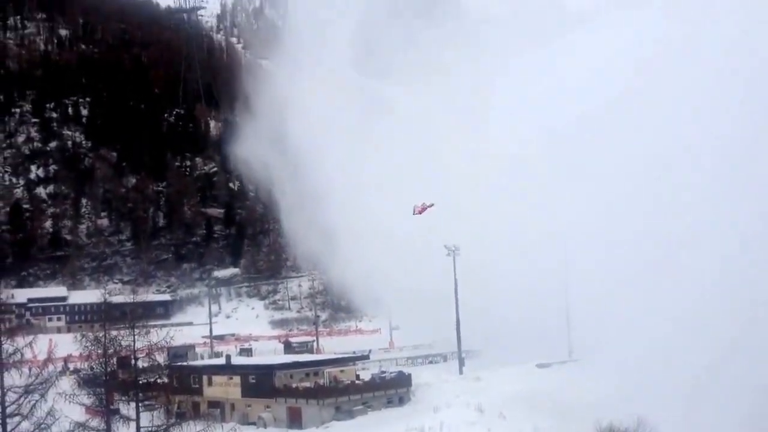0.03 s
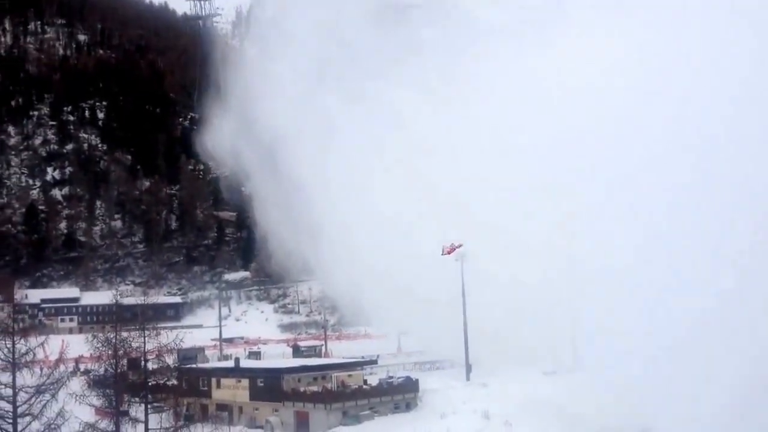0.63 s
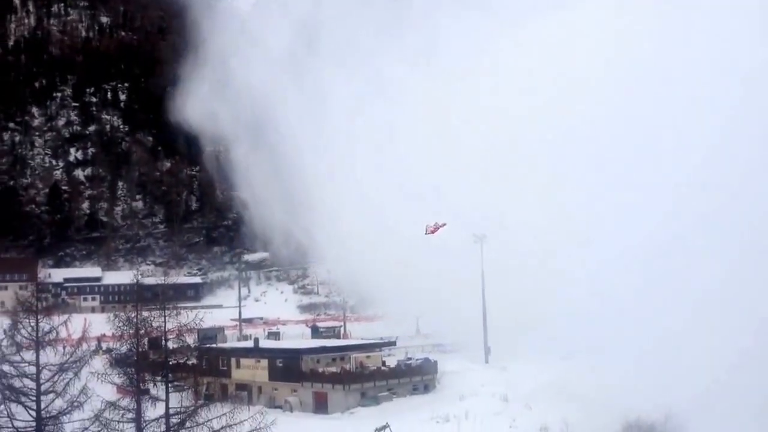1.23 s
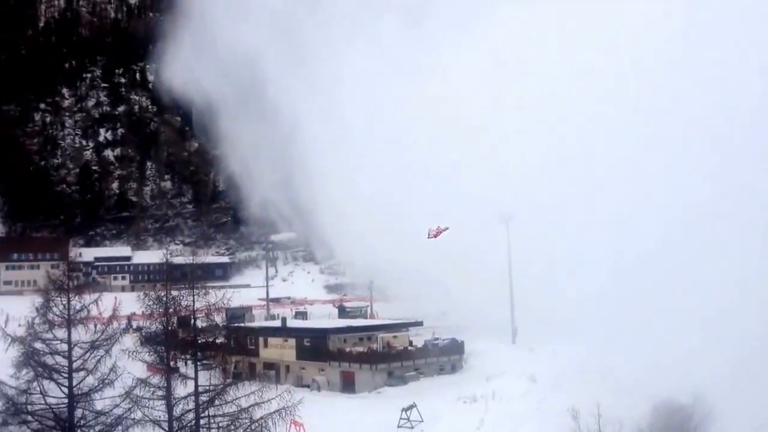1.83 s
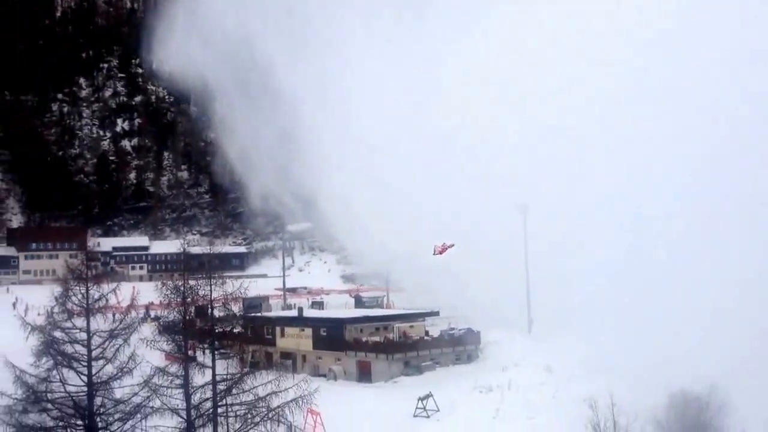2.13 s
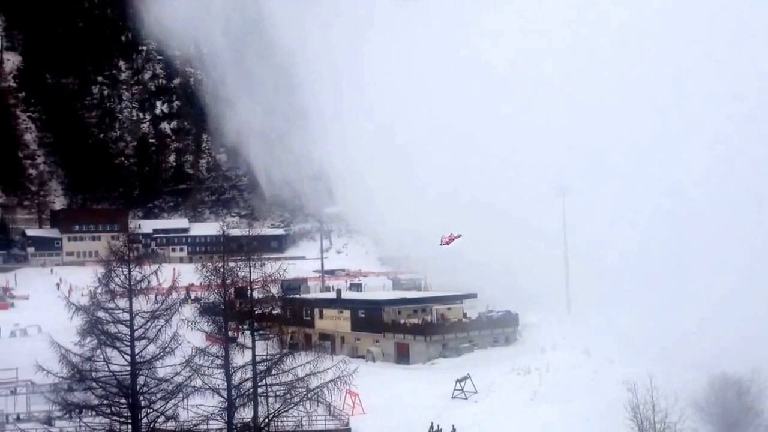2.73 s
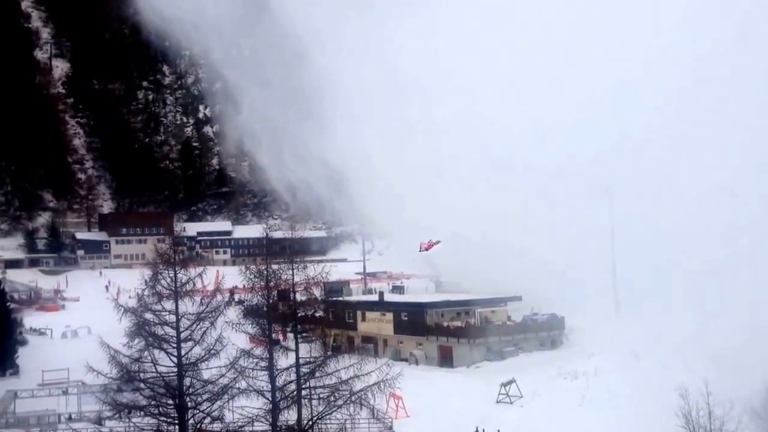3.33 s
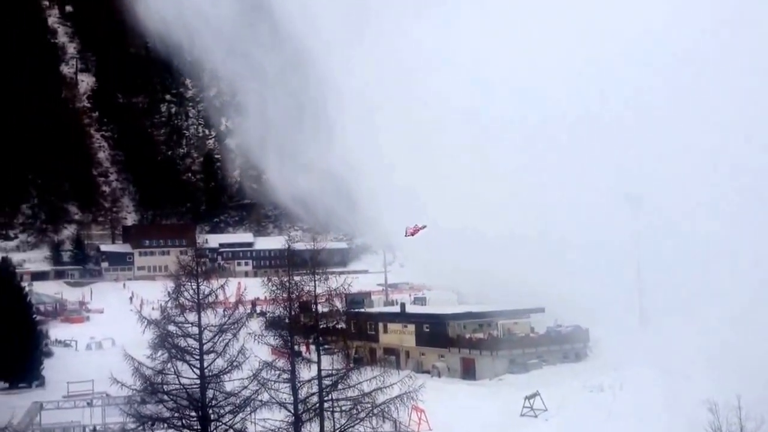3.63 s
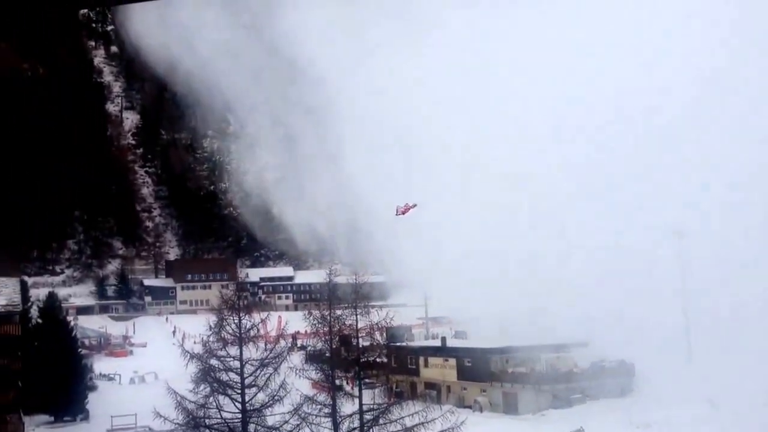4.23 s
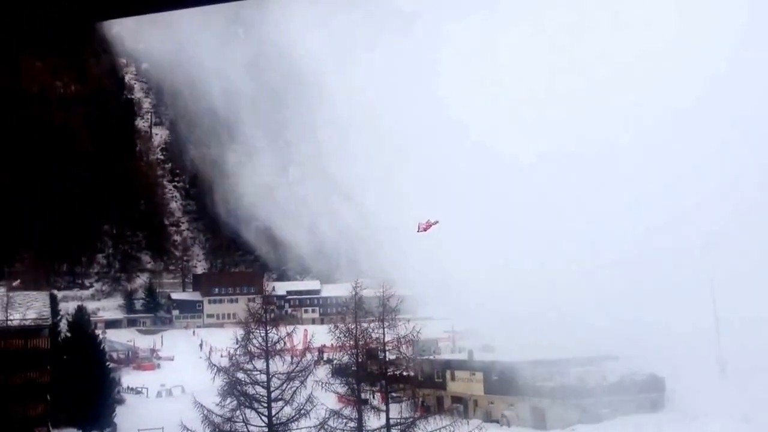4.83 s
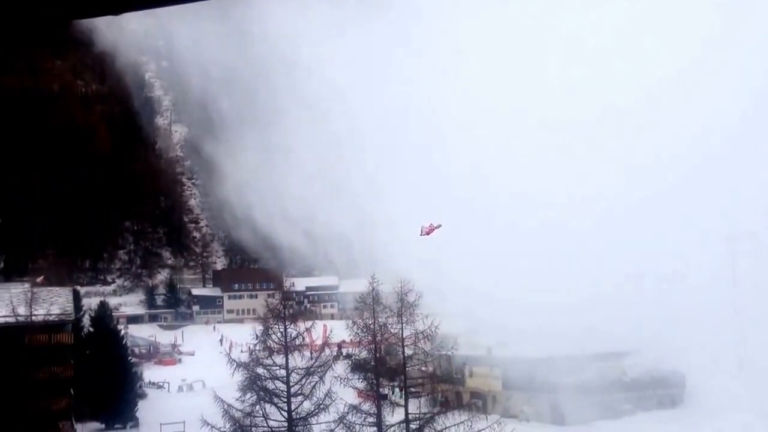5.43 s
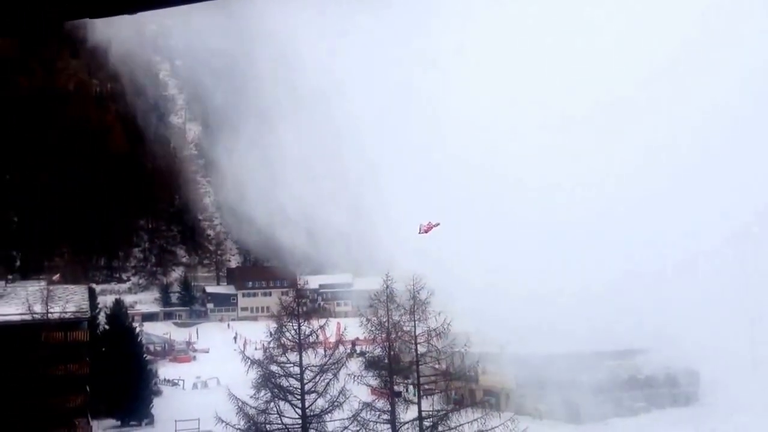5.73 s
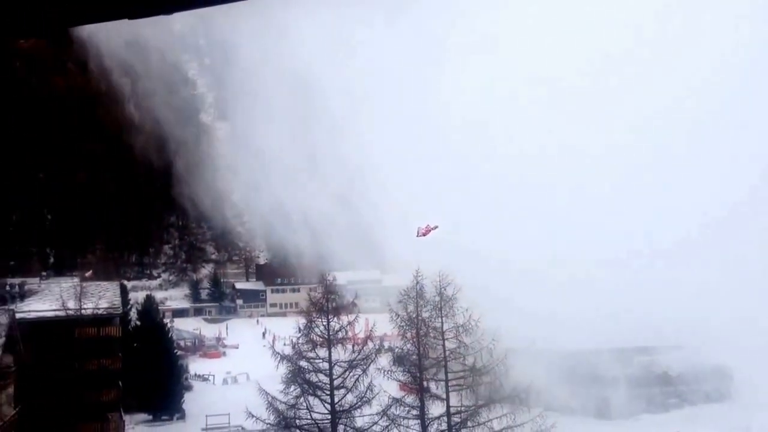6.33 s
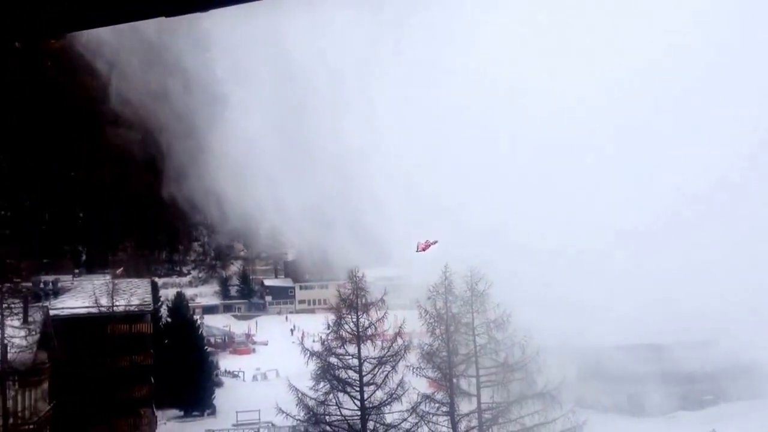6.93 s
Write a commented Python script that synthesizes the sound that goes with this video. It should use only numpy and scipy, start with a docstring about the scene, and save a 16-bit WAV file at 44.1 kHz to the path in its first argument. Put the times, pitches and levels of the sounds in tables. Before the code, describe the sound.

A far-off avalanche roars and hisses steadily while gusts thump and flutter on the microphone, easing briefly, then returning harder.

```python
"""A powder avalanche rolls down a mountainside and over a ski area, a steady rush far from the microphone.
At first gusts hit the microphone: each eddy is a short, dull thud over a low flutter; the fastest snap.
As the wind drops, three faint, thin whistles sound in the distance, between about 1.8 and 3.3 s.
From 3.5 s the gusts return. Past 5 s they are at their hardest and make the gain control duck the rush."""
import sys
import numpy as np
from scipy import signal
from scipy.fft import rfft, irfft
from scipy.io import wavfile
from scipy.ndimage import uniform_filter1d, minimum_filter1d

SR = 44100
rng = np.random.default_rng(int(sys.argv[2]) if len(sys.argv) > 2 else 0)


def to_wav(sig):
    """Store sig (one row per channel, or 1-D mono) as 16-bit WAV at the path in sys.argv[1].

    Samples outside -1..1 are clipped; the rate is SR.
    """
    pcm = np.clip(np.atleast_2d(sig), -1, 1) * 32767
    pcm = np.round(pcm).astype(np.int16)
    wavfile.write(sys.argv[1], SR, pcm.T)  # frames by channels


N = 308700
TIME = np.arange(N) / SR


# Hard eddies, right on the microphone. Each row: middle in seconds, level in dB, length in seconds,
# corner in Hz above which the turbulence dies (thuds and snaps each scale it).
HARD_EDDIES = [(.008, -9, .013, 468), (0.036, -18, .014, 420), (0.077, -17, .016, 254),
               (.112, -5.5, .005, 400), (.134, -11, 0.021, 379), (0.235, -16, .022, 345),
               (.263, -10, .02, 295), (.385, -15.5, .013, 256), (.548, -16.5, .005, 225),
               (0.639, -18.5, .005, 256), (0.709, -22, .022, 193), (0.813, -21, .014, 230),
               (0.931, -28, .02, 233), (1.222, -16.5, .02, 217), (1.241, -20.5, .016, 283),
               (1.329, -32, 0.012, 220), (1.596, -16, .005, 185), (1.62, -21, .018, 198),
               (1.73, -19.5, .008, 137), (1.811, -22, .0085, 242), (2.028, -21.5, .006, 162),
               (2.13, -20.5, 0.025, 195), (2.169, -23, 0.01, 222), (2.405, -22, .018, 114),
               (2.455, -24, 0.032, 187), (2.555, -26.5, .018, 121), (3.546, -28.5, .01, 140),
               (3.598, -30.5, .024, 110), (3.853, -20, 0.027, 278), (3.952, -14, 0.0086, 363),
               (3.975, -17, 0.02, 314), (4.054, -18.5, .013, 256), (4.088, -15.5, .007, 230),
               (4.175, -30.5, 0.033, 204), (4.368, -30, .037, 184), (4.602, -23.5, .015, 233),
               (4.64, -22.5, .016, 303), (4.714, -16, 0.0097, 430), (4.735, -17, .006, 246),
               (4.758, -17.5, .018, 329.4), (4.877, -17.5, .013, 410), (4.953, -20.5, .021, 343),
               (5.063, -12, 0.013, 344), (5.09, -16.5, 0.022, 293), (5.11, -5, .006, 513),
               (5.125, -5.5, .009, 328.5), (5.172, -7.5, .006, 500), (5.191, -17.5, 0.015, 470),
               (5.209, -9, .006, 563), (5.249, -12, .012, 745), (5.275, -13.5, .016, 590),
               (5.296, -4.5, .009, 400), (5.418, -17.5, .015, 454), (5.448, -16.5, .014, 466),
               (5.467, -10.5, 0.0026, 600), (5.489, -6.5, .016, 545), (5.563, -6, .016, 440),
               (5.603, -14.5, 0.0027, 690), (5.614, -9, 0.0097, 327), (5.639, -12, 0.011, 420),
               (5.708, -3.5, .0064, 523), (5.727, -10, .011, 593), (5.937, -10, .0046, 328.5),
               (5.999, -14, .012, 309), (6.363, -12.5, .015, 432), (6.482, -21, 0.0064, 400),
               (6.531, -15, .009, 302), (6.569, -15, .005, 391), (6.622, -5.5, .008, 503),
               (6.653, -15.5, 0.019, 275), (6.674, -12, .006, 326.3), (6.747, -8.5, .015, 324),
               (6.784, -20.5, 0.024, 210), (6.876, -17.5, .01, 168)]
def buffets(eddies, rise=0.62, fall=0.724, wake=0.045, corner_scale=0.97, size=8192, count=400):
    """Each eddy thuds on the microphone: a brief swell of random pressure with a weaker wake around it."""
    out = np.zeros(N + 2 * size)
    t = (np.arange(size) - size // 2) / SR
    for (s, db, length, corner_hz), churn in zip(eddies, rng.standard_normal((count, size))):
        width = length * np.where(t < 0, rise, fall)
        swell = np.exp(-(t / width) ** 2) + wake * np.exp(-abs(t) / length)
        thud = port(churn * swell, corner_hz * corner_scale, damping=1.427) * np.hanning(size)
        thud *= np.sqrt(length * SR / np.sum(thud ** 2))  # the level holds over the eddy's length
        centre = np.sum(np.arange(size) * thud ** 2) / np.sum(thud ** 2)
        start = int(s * SR - centre) + size
        out[start:start + size] += undb(db) * thud
    return out[size:size + N]


def snaps(gain_db=-2, above_hz=328, corner_scale=1.574, lead=0.2013, rebound_s=0.0005, size=2048):
    """A fast eddy tears off the microphone port: a pressure jump of either sign, then instant suction."""
    out = np.zeros(N + size)
    t = np.arange(size) / SR
    suction = np.exp(-t / rebound_s)
    jump = (t == 0) - suction / suction.sum()
    signs = rng.choice([-1, 1], len(HARD_EDDIES))
    for (s, db, length, corner_hz), sign in zip(HARD_EDDIES, signs):
        if corner_hz > above_hz:
            snap = port(jump, corner_scale * corner_hz, damping=0.99)
            start = max(int((s - lead * length) * SR), 0)  # just ahead of the thud's middle
            out[start:start + size] += sign * undb(db + gain_db) * snap / abs(snap).max()
    return out[:N]


# Wind where the microphone stands. Each row: time in seconds, level in dB before each layer's gain.
WIND_AT_MIC = [(0, -25.5), (.1, -18.5), (.35, -55), (.8, -35.5), (1, -50.5), (1.75, -42), (2.3, -54),
               (2.65, -55.5), (3.35, -56), (3.75, -46), (3.99, -22.5), (4.14, -38), (4.5, -47), (4.8, -32),
               (5.22, -25.5), (5.8, -33), (6.7, -29), (7, -35)]
def small_eddies(per_s=22, gain_db=3.5, scatter_db=4.5, length_s=0.01, count=300):
    """Random rows like those of HARD_EDDIES: they grow with the wind, and the stronger are brighter."""
    wait, scatter, stretch = rng.random((count, 3)).T
    s = np.cumsum(2 * wait) / per_s
    wind_db = np.interp(s, *np.transpose(WIND_AT_MIC))
    db = wind_db + gain_db + scatter_db * (2 * scatter - 1)
    typical_hz, typical_db, octaves_per_db = 236.5, -28.5, 0.0033
    corner_hz = typical_hz * 2 ** (octaves_per_db * (db - typical_db))
    return np.column_stack([s, db, length_s * (0.5 + stretch), corner_hz])[s < TIME[-1]]


def flutter(gain_db=-5.5, fast_db=-6.5, gusty_db=-32, uneven_db=6, tick_db=9.5):
    """Small eddies keep the port rumbling; stronger wind adds faster, brighter ones that come in ticks."""
    wind_db, = curves(WIND_AT_MIC)
    slow = unit(port(rng.standard_normal(N), corner_hz=154, damping=1.74))
    ticks = rng.standard_normal(N) * undb(tick_db * np.tanh(walk(per_s=150)))
    fast = unit(port(ticks, corner_hz=400, damping=0.86))
    brightness = undb(fast_db + 0.37 * (wind_db - gusty_db))
    waver_db = uneven_db * np.tanh(walk(per_s=80))
    return (slow + brightness * fast) * undb(wind_db + gain_db + waver_db)


def port(pressure, corner_hz, damping, leak_hz=74.4):
    """Turbulence at the microphone port: a steep fall above the corner, and the deep bass leaks away."""
    jf = 1j * np.fft.rfftfreq(len(pressure), 1 / SR)
    high, low = jf / corner_hz, jf / leak_hz
    fall = 1 / (1 + damping * high + high ** 2) ** 2
    leak = low ** 3 / ((1 + low) * (1 + low + low ** 2))
    return irfft(rfft(pressure) * fall * leak, len(pressure))


# Roar of flowing snow, far up the mountainside. Each row: frequency in Hz, relative density in dB.
SNOW_ROAR = [(30, -30.5), (70, -3.5), (150, -15.5), (260, -5.5), (350, -6.5), (440, -1), (560, 1),
             (650, -6.5), (760, -3), (950, -8), (1300, -9), (1750, -13), (2600, -19), (5000, -40)]
# Hiss of snow dust and air, as far away. Each row: frequency in Hz, relative density in dB.
DUST_HISS = [(600, -6.5), (1500, 0), (2700, -0.5), (4000, -5), (5200, -9), (7000, -15.5), (10000, -20.5),
             (15000, -23.5)]
# The rush as it reaches the microphone. Each row: time in seconds, roar and hiss in dB before gain.
FAR_RUSH = [(0, -56, -59.5), (1.35, -57, -61), (1.75, -55.5, -59.5), (2.8, -55.3, -61.4), (5, -56, -60),
            (7, -56, -62)]
def avalanche(roar_gain_db=6, hiss_gain_db=4):
    """Distance blends the tumbling snow into a gently churning roar under a smooth hiss."""
    roar_db, hiss_db = curves(FAR_RUSH)
    roar = coloured(SNOW_ROAR, flicker_db=1.75, flicker_per_s=14) * undb(roar_db + roar_gain_db)
    hiss = coloured(DUST_HISS, flicker_db=0.3, flicker_per_s=10) * undb(hiss_db + hiss_gain_db)
    return roar + hiss


# Whistles, a long way from the microphone. Each row: middle in seconds, half-length in seconds,
# middle pitch in Hz, glide over each half in Hz, level at the middle in dB.
FAR_WHISTLES = [(1.83, 0.053, 1794, -41, -59), (2.215, 0.077, 1570, 61, -57),
                (3.229, 0.067, 1730, 169.5, -54)]
def whistles(blur=0.0082):
    """Thin gliding tones, blurred by the valley."""
    out = 0
    waver = 1 + blur * walk(per_s=210)
    for s, half_length, hz, glide_hz, db in FAR_WHISTLES:
        along = np.clip((TIME - s) / half_length, -1, 1)
        phase = 2 * np.pi * np.cumsum((hz + glide_hz * along) * waver) / SR
        swell = np.cos(np.pi * along / 2) ** 2
        out = out + unit(np.sin(phase)) * undb(db) * swell
    return out


def coloured(points, flicker_db, flicker_per_s):
    """Noise with a given spectrum whose octave bands each waver on their own."""
    octave = np.log2(np.maximum(np.fft.rfftfreq(N, 1 / SR), 1))
    hz, db = np.transpose(points)
    spectrum = rfft(rng.standard_normal(N)) * undb(np.interp(octave, np.log2(hz), db))
    out = 0
    for centre in range(4, 15):  # octaves from 16 Hz to 16 kHz
        band = irfft(spectrum * np.maximum(1 - abs(octave - centre), 0), N)
        out = out + band * undb(flicker_db * walk(flicker_per_s))
    return unit(out)


def walk(per_s):
    """Random levels, per_s of them a second, smoothed twice; rms 1."""
    hold = max(int(SR / per_s), 1)
    steps = np.repeat(rng.standard_normal(N // hold + 1), hold)
    return unit(uniform_filter1d(uniform_filter1d(steps, hold), hold)[:N])


def curves(table):
    """Each column after the first, joined by straight lines in time."""
    s, *columns = np.transpose(table)
    return [np.interp(TIME, s, column) for column in columns]


def undb(db):
    """Decibels to gain."""
    return 10 ** (np.asarray(db) / 20)


def unit(x):
    """Scale to an rms of 1."""
    return x / np.sqrt(np.mean(x ** 2))


def scene():
    """One microphone in the wind, with the avalanche and the whistles far off."""
    eddies = np.vstack([HARD_EDDIES, small_eddies()])
    wind = buffets(eddies) + snaps() + flutter()
    far = avalanche() + whistles()
    return (wind + far)[None]


def duck(sound, above_db=-10, window_s=0.013, recovery_db_per_s=4.5):
    """The recorder's gain control: a hard buffet turns everything down, and the level creeps back."""
    window = int(window_s * SR)
    power = uniform_filter1d(sound ** 2, window)
    over_db = 10 * np.log10(np.maximum(power / undb(above_db) ** 2, 1))
    recovered_db = recovery_db_per_s * TIME
    cut_db = np.maximum.accumulate(over_db + recovered_db, axis=-1) - recovered_db
    return sound * undb(-uniform_filter1d(cut_db, window))


def record(dry, ceiling=0.65, ahead_samples=441, top_hz=15350):
    """Gain control, then a look-ahead limiter for the last peaks; the ends are eased and the top is cut."""
    ducked = duck(dry)
    gain = ceiling / np.maximum(abs(ducked), ceiling)
    gain = uniform_filter1d(minimum_filter1d(gain, 2 * ahead_samples), ahead_samples)
    ease = np.minimum(np.minimum(TIME, TIME[::-1]) / 0.003, 1)
    lowpass = signal.ellip(10, 0.1, 80, top_hz, fs=SR, output="sos")
    return signal.sosfilt(lowpass, ducked * gain * ease)


dry = scene()
out = record(dry)
to_wav(out)
```